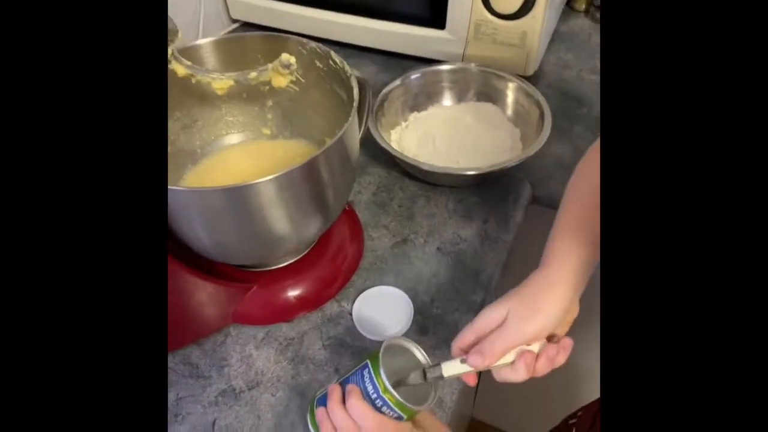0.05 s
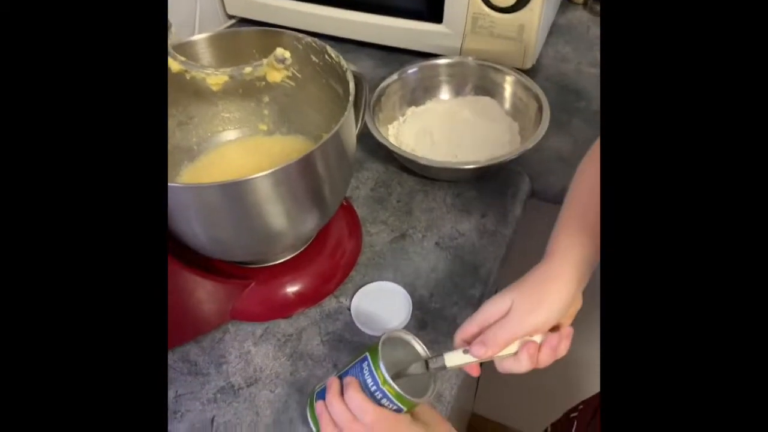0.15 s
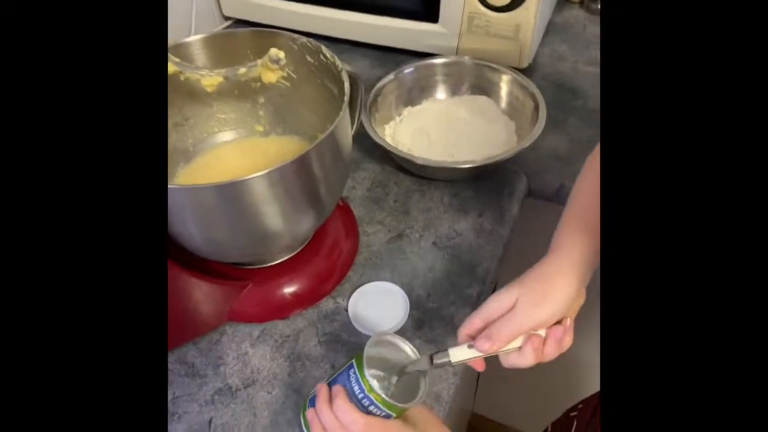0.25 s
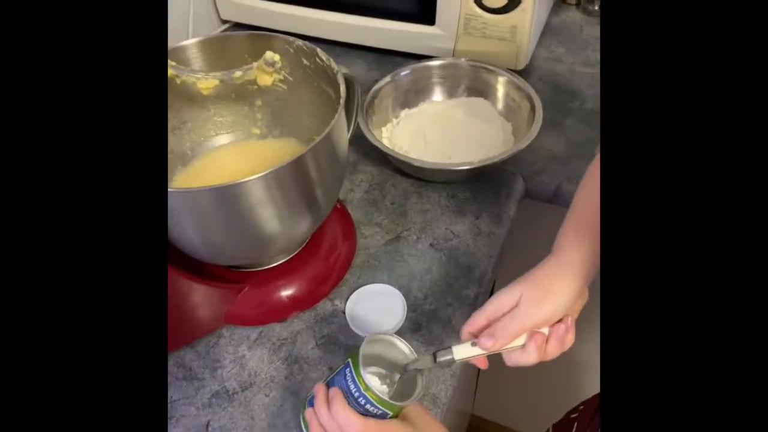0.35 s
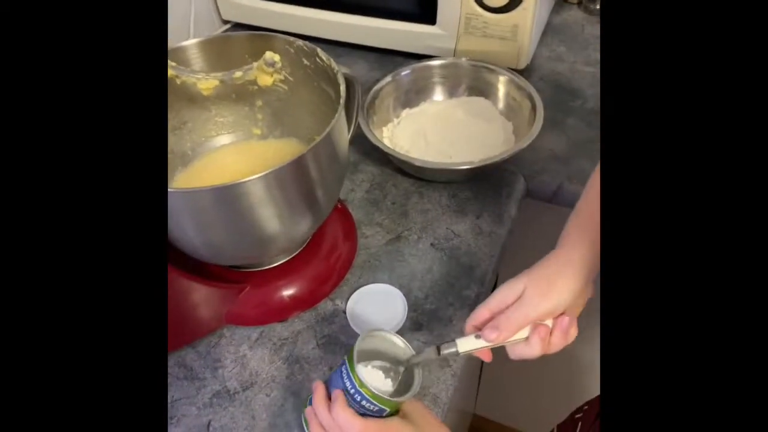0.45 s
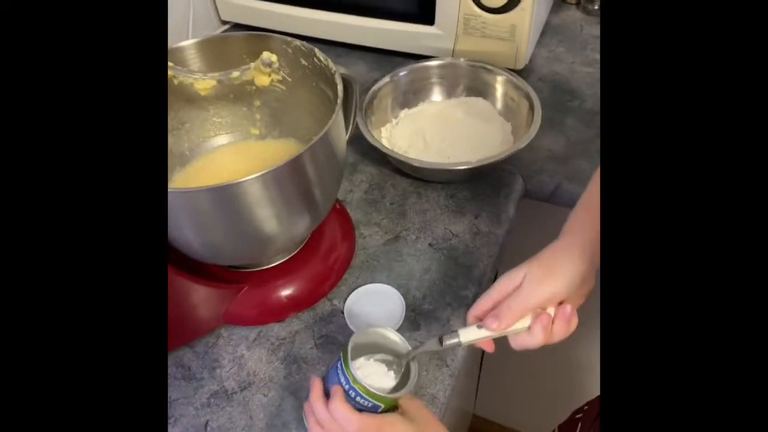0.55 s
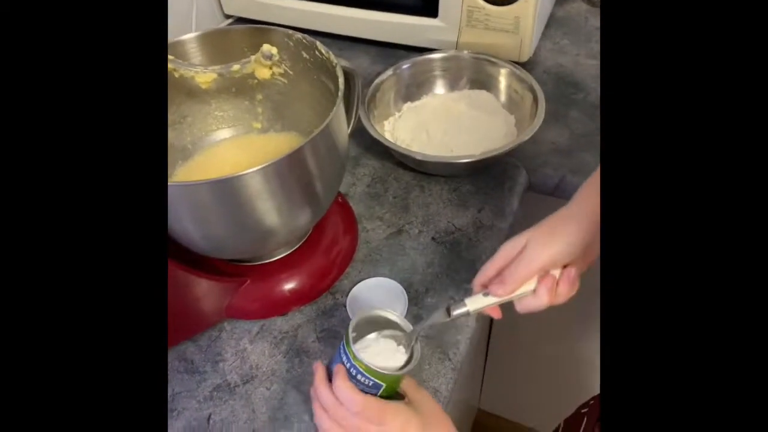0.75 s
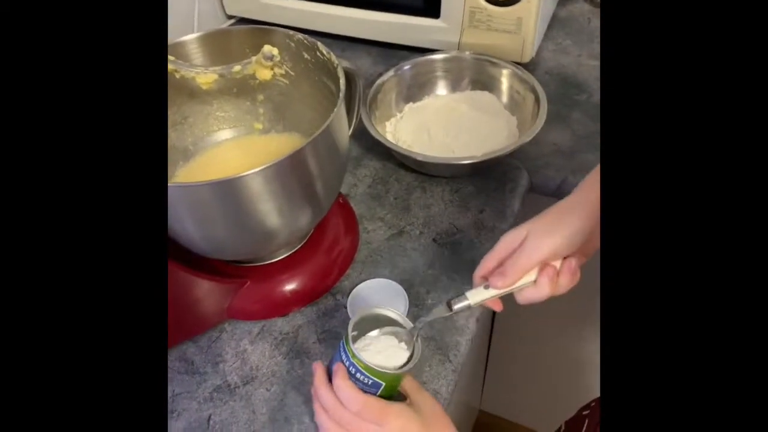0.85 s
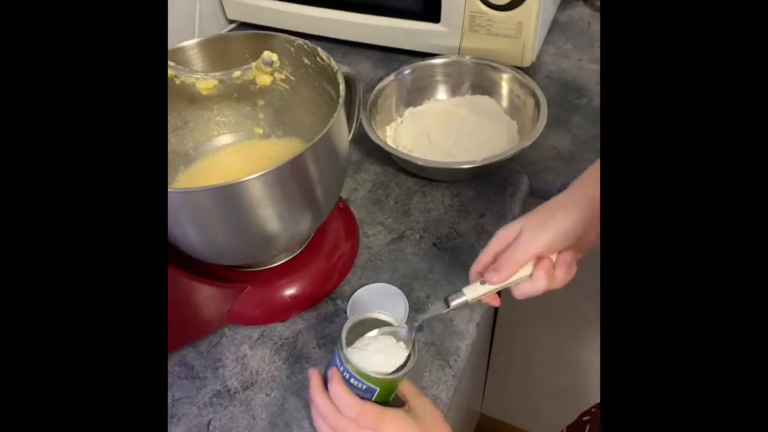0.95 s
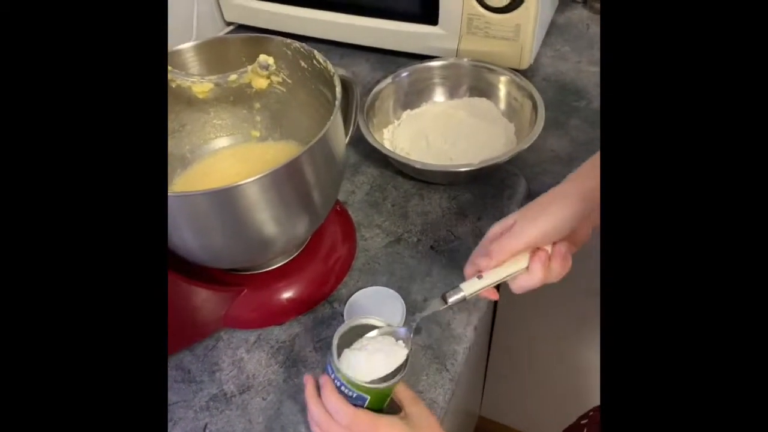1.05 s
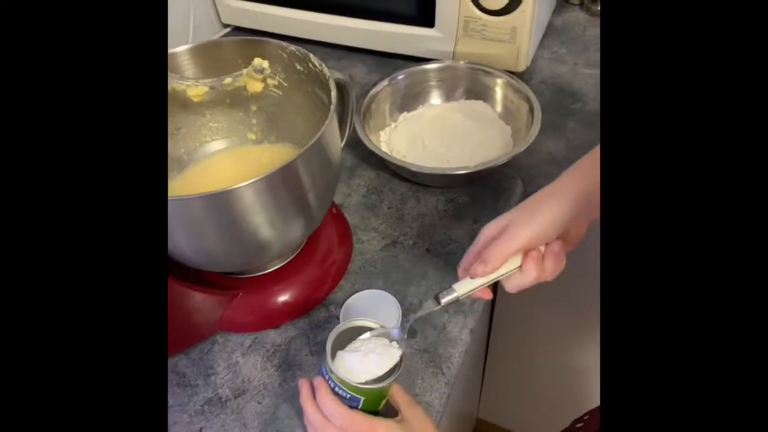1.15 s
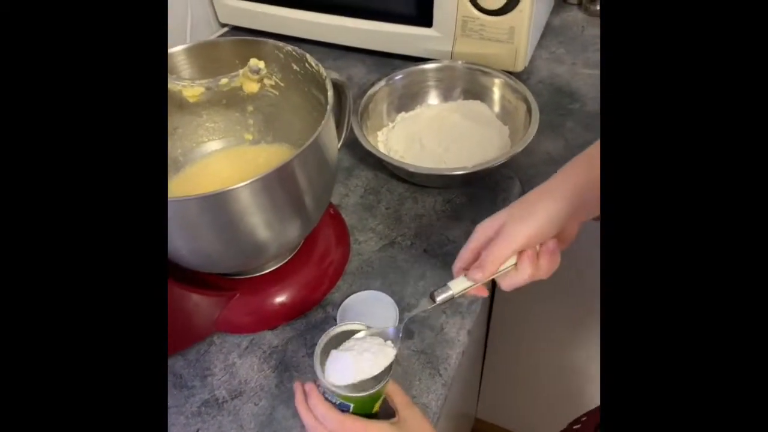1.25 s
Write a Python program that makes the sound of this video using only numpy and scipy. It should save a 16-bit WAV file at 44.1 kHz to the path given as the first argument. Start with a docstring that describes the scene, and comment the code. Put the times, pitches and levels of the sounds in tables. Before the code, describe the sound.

A metal spoon scrapes hard inside a small powder tin, with one loud hollow knock mid-drag

```python
"""In a kitchen, a metal spoon digs baking powder out of a small tin.
It knocks the tin, drags hard along the wall, duller as it sinks into the powder, and knocks once more
during the drag. Light slides over the rim, small ticks and two faint knocks surround this.
Scrapes are dense random grains, filtered; resonances are randomly pushed tones; knocks are falling
sweeps with fading sines; ticks are noise and sines. A soft rustle, echoes and quiet room noise lie below."""
import sys
import numpy as np
from scipy import signal
from scipy.fft import rfft, irfft
from scipy.io import wavfile
from scipy.ndimage import map_coordinates

SR = 44100
rng = np.random.default_rng(int(sys.argv[2]) if len(sys.argv) > 2 else 0)


def generate_wav(sig):
    """Save sig (samples, or channels by samples) to the path in sys.argv[1] as 16-bit PCM at SR."""
    pcm = np.round(np.clip(np.atleast_2d(sig).T, -1, 1) * 32767).astype(np.int16)
    wavfile.write(sys.argv[1], SR, pcm)


N = 57330
T = np.arange(N) / SR  # time in s
HZ = np.fft.rfftfreq(2 * N, 1 / SR)  # frequencies of a spectrum padded to twice the length

# colour of the quiet kitchen: f/Hz, relative level/dB
AIR_COLOUR = [(25, 14.5), (90, -5), (160, -3), (400, -17), (800, -11), (2000, -8.5), (6000, -9.5),
              (11000, -21), (16000, -15.5)]
AIR_DB, WHINE_HZ, WHINE_WIDTH_HZ, WHINE_DB = -70, 12170, 420, -77.5
# how long the room's echoes take to drop by 60 dB: f/Hz, t60/s
ROOM_DECAY = [(150, .45), (800, 0.46), (4000, 0.2), (9000, 0.32), (15000, 0.18)]
ROOM_DB = -14.5
LOW_CUT_HZ, EDGE_HZ = 110, 15950

# low rustle of the shifting tin and powder: t/s, level/dB
RUSTLE_LEVEL = [(0, -56.5), (.06, -57), (.125, -63), (.17, -56), (.3, -56.5), (.38, -45), (.45, -52.5),
                (.55, -52.5), (.635, -64.5), (.71, -57.5), (.8, -62), (.88, -69.5), (.98, -60),
                (1.03, -65.5), (1.08, -66.5), (1.22, -72)]
# colour of the rustle: f/Hz, relative level/dB
RUSTLE_TONE = [(40, -13), (100, -17.5), (150, -8), (250, -0.5), (580, -5.5), (730, -1), (1050, -9),
               (1500, -4.5), (2400, -12), (6000, -15), (14000, -45)]

# ticks of the spoon: t/s, level/dB, ring f/Hz, ring against chatter/dB,
# tilt/(dB per octave), treble edge f/Hz
SPOON_TICKS = [(0.0447, -40, 13960, 1.5, 4, 16800), (0.051, -50.5, 8830, 3, 13, 16000),
               (0.223, -25.5, 3680, -14, 2, 11600), (0.522, -42, 6480, 0.5, 4, 7540),
               (0.675, -58, 13300, 6.5, 3, 15500), (0.734, -55, 6910, 7.5, -1, 12000),
               (0.7554, -55.5, 9640, 11, 0, 15000), (0.938, -45.5, 8950, -6.5, 4, 15500),
               (0.9858, -48, 6300, 4.5, 1, 8050), (1.0287, -53, 5800, -5.5, -4, 7100),
               (1.0628, -54.5, 6200, -20, -3.5, 7580), (1.2414, -52, 3033, 4.5, -3.5, 7520),
               (1.258, -52.5, 2976, -1.5, -3.5, 7620)]
TICK_T60_S, TICK_RISE_S, TICK_LOW_HZ = 0.038, 0.0033, 595
# partials of a tick's ring, a close pair and an overtone: frequency ratio, level/dB
TICK_PARTIALS = [(.955, 2), (1.04, 2), (2.03, -6)]
RING_T60_S = 0.026

# light slides on the rim: start t/s, peak t/s, end t/s, level/dB, pitch factor
RIM_SLIDES = [(-.02, 0.015, 0.1, -58, 1.13), (0.038, .049, 0.11, -58, 0.89),
              (0.126, 0.164, 0.18, -48.5, 1.15), (0.169, 0.205, 0.28, -38.5, 1.07),
              (0.432, 0.485, 0.71, -64.5, 0.95), (0.867, .92, 0.96, -62.5, 1.02),
              (0.671, 0.763, 0.81, -45, 0.96), (0.918, 0.961, 1.024, -50, 0.91)]
SLIDE_ENDS_DB, SLIDE_FADE_S = -20.5, 0.011  # level at both ends against the peak; fade at both ends
SLIDE_GRAINS_PER_S, SLIDE_SPREAD_DB = 1300, 3.6
SLIDE_CLUMP_DB, SLIDE_CLUMP_HZ = 3.5, 90.57  # depth and top speed of the uneven contact
# colour of the spoon's friction: f/Hz, relative level/dB
SPOON_COLOUR = [(100, -43.5), (500, -16), (1400, -9), (2400, -13), (3300, -2), (5000, -13), (8000, -4),
                (11000, -0.5), (12500, -14), (14500, -9), (16000, -9.5)]
# modes of the spoon, before a slide's pitch factor: f/Hz, width/Hz, level against friction/dB
SPOON_MODES = [(7110, 540, 0), (8840, 420, -6.5), (9690, 380, -5.5), (11170, 410, -7.5), (13490, 320, -7.5),
               (15000, 430, -2)]

# knocks on the tin: t/s, level/dB, pitch factor of the sweep, level of the ring/dB
TIN_KNOCKS = [(0.1507, -30.5, 1.05, 4), (.3481, -10.5, 0.939, 1), (1.03, -47, 0.985, 0.5),
              (1.064, -55, 0.61, 5)]
# the first bending wave of a knock sweeps down (before the pitch factor)
SWEEP_TOP_HZ, SWEEP_END_HZ, SWEEP_S, SWEEP_PEAK_S = 2152, 697, 0.0018, 0.00098
# what the knocked tin rings with: f/Hz, relative level/dB, t60/s, rise t/s
TIN_MODES = [(844, -3, 0.023, 0.00049), (961, -18.5, 0.11, .001), (1526, -15.5, 0.068, .0004),
             (321, -17.5, 0.037, 0.00099), (237.1, -28, 0.25, 0.0067), (151.8, -11, 0.11, 0.022)]
TIN_LAG_S = 0.003477  # the ring starts this long after the sweep
# the struck tin rattles on, unevenly
RATTLE_HZ, RATTLE_WIDTH_HZ, RATTLE_DB, RATTLE_T60_S = 845, 267, -17, 0.19

# flaring resonances of the rubbed tin: peak t/s, half length/s, f/Hz, width/Hz, level/dB
TIN_FLARES = [(0.265, .022, 326.6, 12, -49), (0.256, 0.0065, 3300, 100, -32),
              (0.298, 0.03, 2156, 200, -33.5), (.386, 0.0068, 810, 56, -32), (0.406, 0.04, 2195, 460, -43),
              (0.507, 0.055, 748.4, 100, -48.5), (0.512, 0.029, 2247, 220, -51),
              (0.523, .01, 825, 45, -45.5), (0.578, 0.018, 728, 25, -47.5), (.697, 0.021, 430, 160, -59.5),
              (0.721, 0.016, 1330, 33, -59), (0.767, 0.015, 455, 20, -62.5)]

# the digging stroke: t/s, level/dB, treble edge f/Hz
DIG_STROKE = [(0.217, -75, 15000), (0.235, -33, 13500), (0.25, -22.5, 11700), (0.281, -26, 9800),
              (0.331, -28.5, 7330), (0.382, -34.5, 6900), (0.433, -44.5, 6430), (0.468, -49, 6100),
              (.535, -68, 5740), (0.602, -86, 5000)]
# colour of the scraped wall: f/Hz, relative level/dB
WALL_COLOUR = [(60, -38.5), (180, -25), (330, -14.5), (650, -3.5), (1000, -11.5), (1300, -8.5),
               (1550, -2.5), (2300, -2), (2600, -5), (3300, -2), (4200, -5), (7000, -4.5), (11000, -10.5),
               (16000, -14)]
# resonances of the wall: f/Hz, width/Hz, boost/dB
WALL_RESONANCES = [(1508, 12, 7.5), (1635, 13, 9), (2264, 110, 5), (3350, 130, 2.5), (4976, 110, 7),
                   (6630, 44, 8.5), (7070, 51, 8)]
DIG_GRAINS_PER_S, DIG_SPREAD_DB = 3600, 1
# random louder and softer patches: depth, and size in frequency and time
DIG_PATCH_DB, DIG_PATCH_HZ, DIG_PATCH_S = 1.5, 588, .012


def amp(db):
    """Turns decibels into gain."""
    return 10 ** (np.asarray(db) / 20)


def evened(x):
    """Scales a signal to an rms of 1."""
    return x / np.sqrt(np.mean(x ** 2) + 1e-20)


def read(points, hz):
    """Reads a table of values between its points, along a log-frequency axis."""
    f, value = np.transpose(points)
    return np.interp(np.log(hz + 1), np.log(f), value)


def level(times, db):
    """Draws a gain curve through points in dB, practically silent outside them."""
    return amp(np.interp(T, times, db, left=-140, right=-140))


def boosts(peaks):
    """The lift in dB that resonances give to a spectrum."""
    power = 1
    for hz, width, db in peaks:
        power = power + (amp(abs(db)) ** 2 - 1) / (1 + (2 * (HZ - hz) / width) ** 2)
    return 10 * np.log10(power)


def colour(x, db):
    """Filters a sound to the given dB at each frequency, without sounding ahead of its cause."""
    log_gain = np.log(amp(np.r_[db, db[-2:0:-1]]))
    response = np.exp(np.conj(signal.hilbert(log_gain)))[:N + 1]
    return irfft(rfft(x, 2 * N) * response)[:N]


def grains(per_s, spread_db):
    """Friction: dense tiny slips of uneven size, in either direction."""
    slips = rng.random(N) < per_s / SR
    sizes = amp(spread_db * np.minimum(rng.exponential(1, N), 4))
    return slips * sizes * rng.choice([-1, 1], N)


def ringing(hz, width_hz):
    """A resonance kept ringing by random pushes, its swings in loudness softened."""
    r = np.exp(-np.pi * width_hz / SR)
    pushes = rng.standard_normal(N) + 1j * rng.standard_normal(N)
    z = signal.lfilter([1], [1, -2 * r, r * r], pushes)
    softened = z / np.sqrt(abs(z) + 1e-12)
    carrier = np.exp(2j * np.pi * np.cumsum(hz * np.ones(N)) / SR)
    return evened((softened * carrier).real)


def air():
    """Room noise, with a thin high whine as a narrow wavering band."""
    noise = evened(colour(rng.standard_normal(N), read(AIR_COLOUR, HZ)))
    return amp(AIR_DB) * noise + amp(WHINE_DB) * ringing(WHINE_HZ, WHINE_WIDTH_HZ)


def room(x, first_s=.004):
    """Sparse reflections from the room, each band dying at its own speed."""
    taps = (rng.random(N) < 2500 / SR) * rng.choice([-1., 1.], N) * (T > first_s)
    hz, t, z = signal.stft(taps, SR, nperseg=256)
    decay = amp(-60 * t / read(ROOM_DECAY, hz)[:, None])
    tail = signal.istft(z * decay, SR, nperseg=256)[1]
    return signal.fftconvolve(x, tail / np.linalg.norm(tail))[:N]


def rustle(per_s=1500):
    """Soft, low friction of the tin and the powder in it, as filtered grains."""
    grit = evened(colour(grains(per_s, 0), read(RUSTLE_TONE, HZ)))
    return grit * amp(np.interp(T, *np.transpose(RUSTLE_LEVEL)))


def tick(start, db, ring_hz, ring_db, tilt_db, edge_hz):
    """A brief chatter of metal, as fading noise, and a damped ring of a few sines."""
    tilt = tilt_db * np.log2(1 + HZ / TICK_LOW_HZ)
    low_cut = 1 + (TICK_LOW_HZ / (HZ + 10)) ** 2
    high_cut = 1 + (HZ / edge_hz) ** 10
    shape = tilt - 10 * np.log10(low_cut * high_cut)
    t = np.maximum(T - start, 0)
    chatter = evened(colour(rng.standard_normal(N), shape)) * amp(-60 * t / TICK_T60_S)
    ring = 0
    for ratio, partial_db in TICK_PARTIALS:
        if ring_hz * ratio < 1.2 * edge_hz:  # partials far above the treble edge are left out
            fade = amp(ring_db + partial_db - 60 * t / RING_T60_S)
            ring = ring + fade * np.sin(2 * np.pi * ring_hz * ratio * t)
    return amp(db) * (np.sqrt(2) * chatter + 2 * ring) * (1 - np.exp(-t / TICK_RISE_S))


def clumps():
    """Uneven contact: a quick random gain."""
    wobble = irfft(rfft(rng.standard_normal(2 * N)) / (1 + (HZ / SLIDE_CLUMP_HZ) ** 4))[:N]
    return evened(amp(SLIDE_CLUMP_DB * evened(wobble)))


def slide(start, peak, end, db, pitch):
    """Fine friction swells and fades; each mode of the spoon flares as the contact point moves."""
    sound = evened(colour(grains(SLIDE_GRAINS_PER_S, SLIDE_SPREAD_DB), read(SPOON_COLOUR, HZ)))
    for hz, width, mode_db in SPOON_MODES:
        sound = sound + amp(mode_db) * ringing(hz * pitch, width) * clumps()
    touch = np.clip(np.minimum(T - start, end - T) / SLIDE_FADE_S, 0, 1)
    swell = level([start, peak, end], [db + SLIDE_ENDS_DB, db, db + SLIDE_ENDS_DB])
    return evened(sound) * touch * swell


def knock(start, db, pitch, ring_db):
    """A hollow knock: a quick falling sweep, then rattle and ring of the wall, the low thud last."""
    t = np.maximum(T - start, 0)
    fall = (SWEEP_TOP_HZ - SWEEP_END_HZ) * SWEEP_S * (1 - np.exp(-t / SWEEP_S))
    turns = pitch * (SWEEP_END_HZ * t + fall)
    burst = (t / SWEEP_PEAK_S * np.exp(1 - t / SWEEP_PEAK_S)) ** 2
    out = amp(db) * burst * np.sin(2 * np.pi * turns)
    t = np.maximum(t - TIN_LAG_S, 0)
    rattle = ringing(RATTLE_HZ, RATTLE_WIDTH_HZ)
    rattle_fade = amp(db + ring_db + RATTLE_DB - 60 * t / RATTLE_T60_S)
    out += rattle * rattle_fade * np.minimum(t / TIN_LAG_S, 1)
    for hz, mode_db, t60, rise in TIN_MODES:
        fade = amp(db + ring_db + mode_db - 60 * t / t60)
        out += fade * (1 - np.exp(-t / rise)) ** 2 * np.sin(2 * np.pi * hz * t)
    return out


def flare(peak, half_s, hz, width_hz, db):
    """One resonance of the tin sings up under the dragging spoon and fades."""
    return ringing(hz, width_hz) * amp(db) * np.exp(-((T - peak) / half_s) ** 2 / 2)


def dig():
    """The spoon grates along the wall in uneven patches; powder damps the treble as it sinks."""
    times, db, edge_hz = np.transpose(DIG_STROKE)
    wall = read(WALL_COLOUR, HZ) + boosts(WALL_RESONANCES)
    grit = evened(colour(grains(DIG_GRAINS_PER_S, DIG_SPREAD_DB), wall))
    hz, t, z = signal.stft(grit, SR, nperseg=256)
    places = np.meshgrid(hz / DIG_PATCH_HZ, t / DIG_PATCH_S, indexing="ij")
    patches = map_coordinates(rng.standard_normal((200, 400)), places, order=1, mode="wrap")
    damping = np.sqrt(1 + (hz[:, None] / np.interp(t, times, edge_hz)) ** 8)
    z = z * amp(DIG_PATCH_DB * evened(patches)) / damping
    return signal.istft(z, SR, nperseg=256)[1][:N] * level(times, db)


def scene():
    """All sounds of the spoon and tin, with the kitchen's echoes and noise."""
    dry = dig() + sum(flare(*row) for row in TIN_FLARES)
    dry = dry + rustle() + sum(knock(*row) for row in TIN_KNOCKS)
    dry = dry + sum(slide(*row) for row in RIM_SLIDES) + sum(tick(*row) for row in SPOON_TICKS)
    return (dry + amp(ROOM_DB) * room(dry) + air())[None]


def record(dry):
    """The recorder's bass cut and its steep limit on the treble."""
    bass_cut = signal.butter(2, LOW_CUT_HZ, "high", fs=SR, output="sos")
    thin = signal.sosfilt(bass_cut, dry)
    treble_limit = signal.firwin(511, EDGE_HZ, window=("kaiser", 9), fs=SR)
    return signal.oaconvolve(thin, treble_limit[None], "same")


dry = scene()
out = record(dry)
generate_wav(out)
```